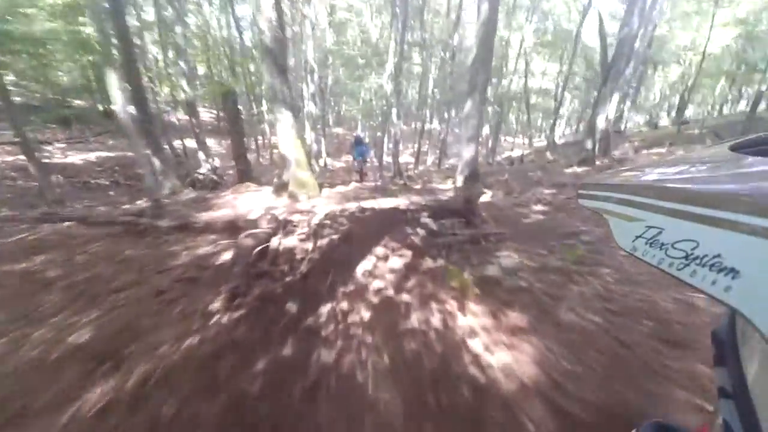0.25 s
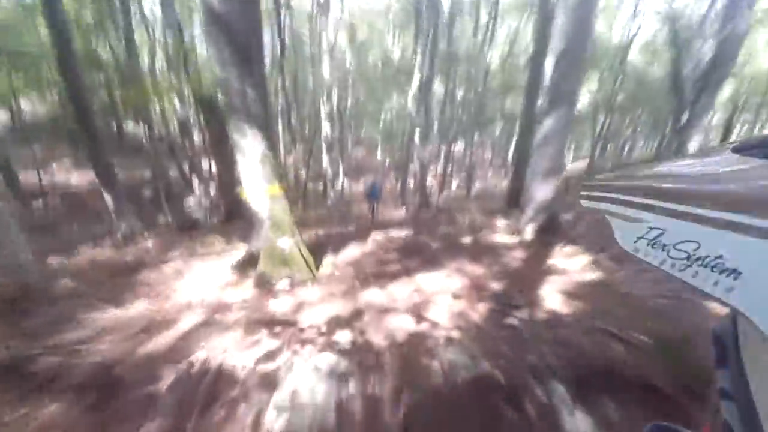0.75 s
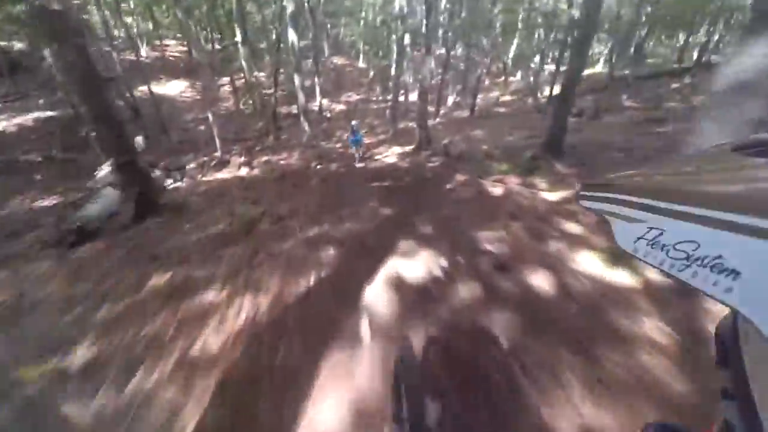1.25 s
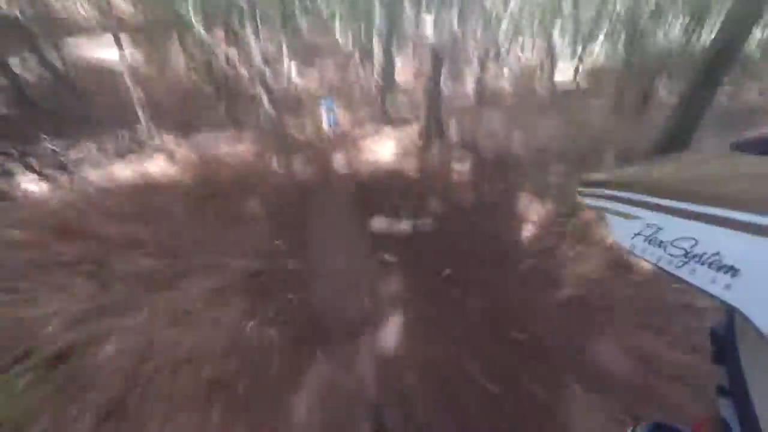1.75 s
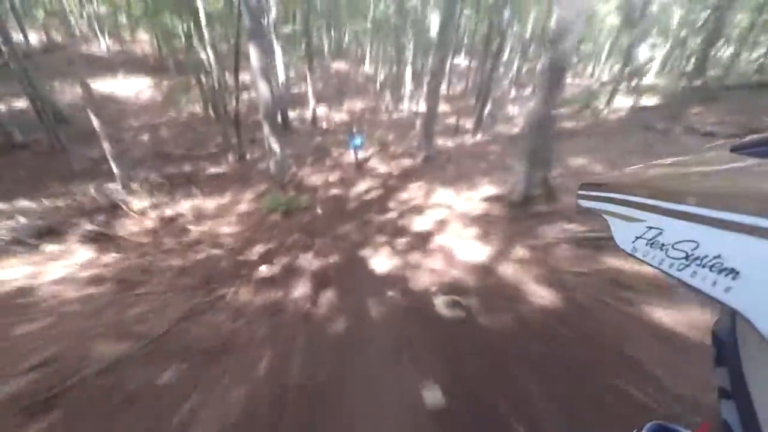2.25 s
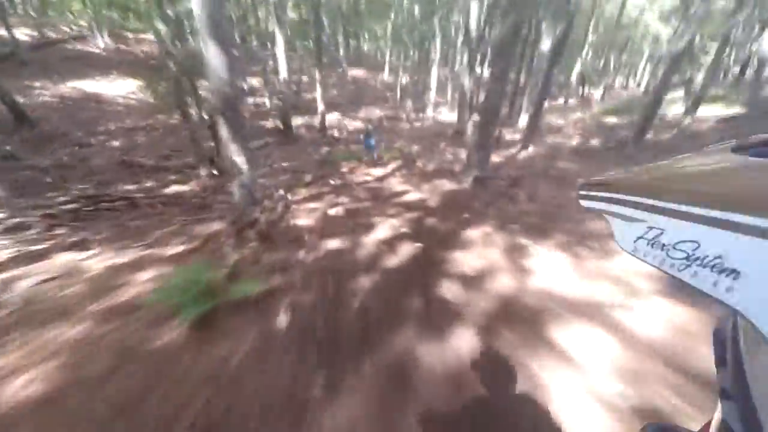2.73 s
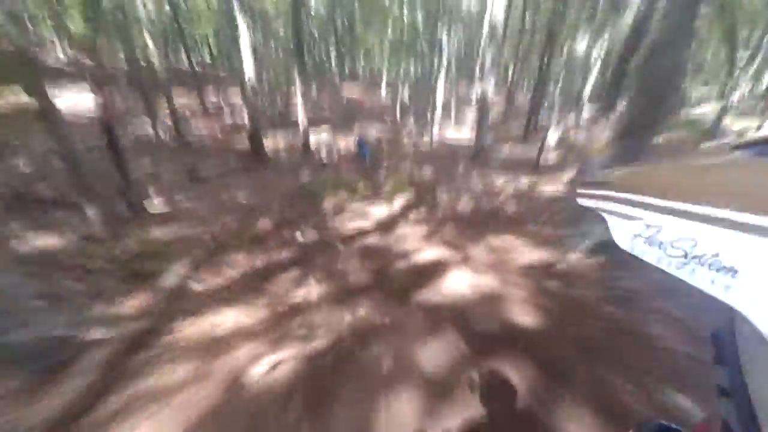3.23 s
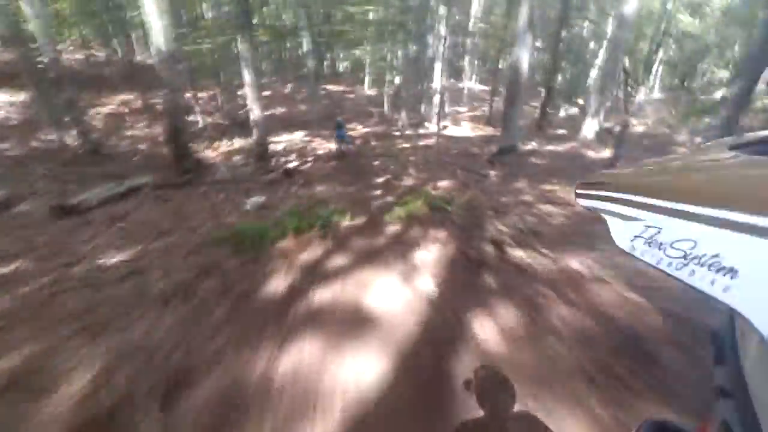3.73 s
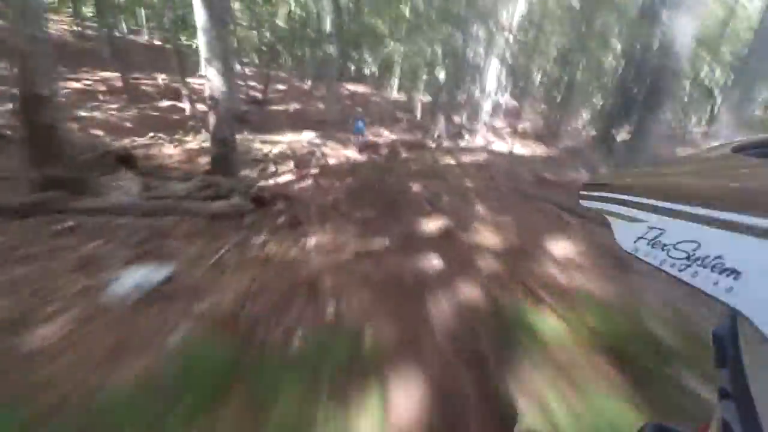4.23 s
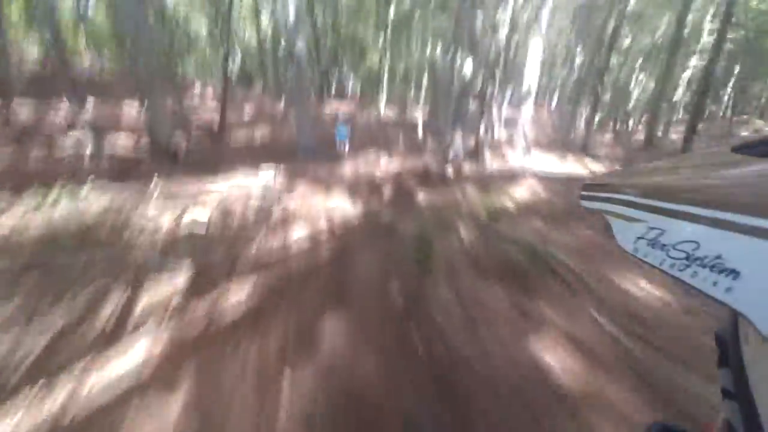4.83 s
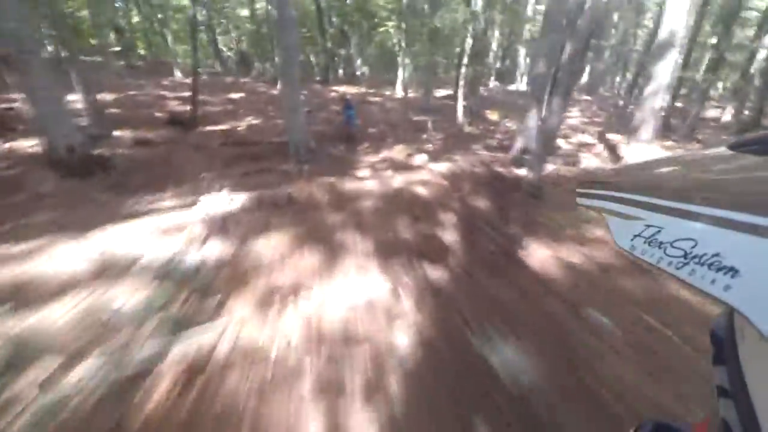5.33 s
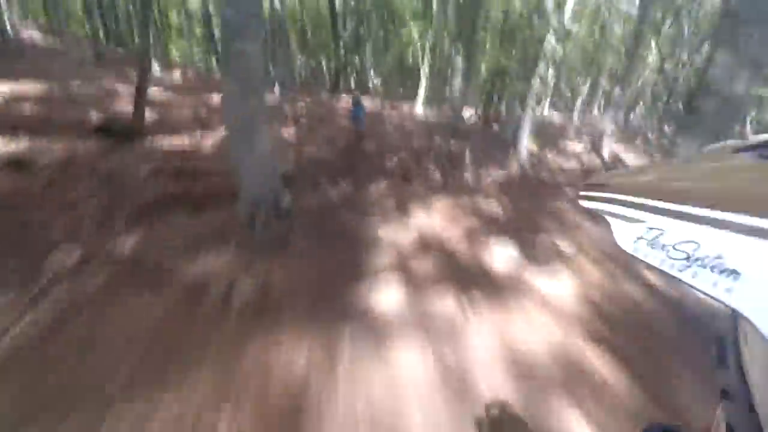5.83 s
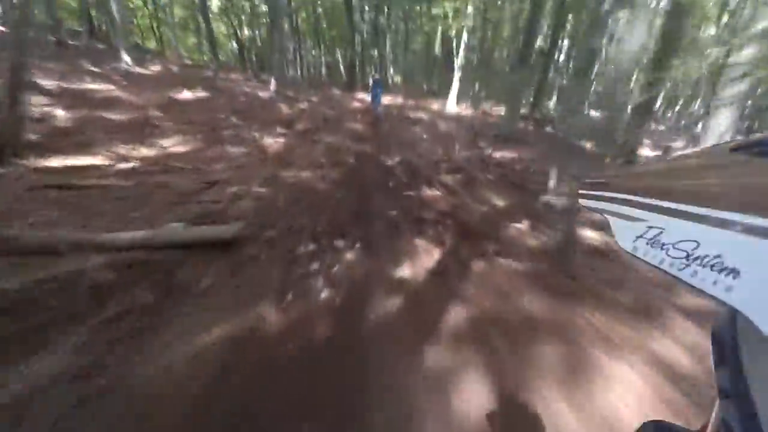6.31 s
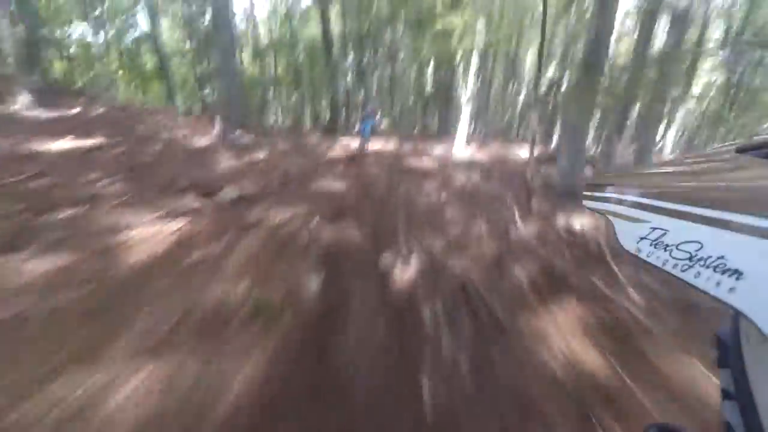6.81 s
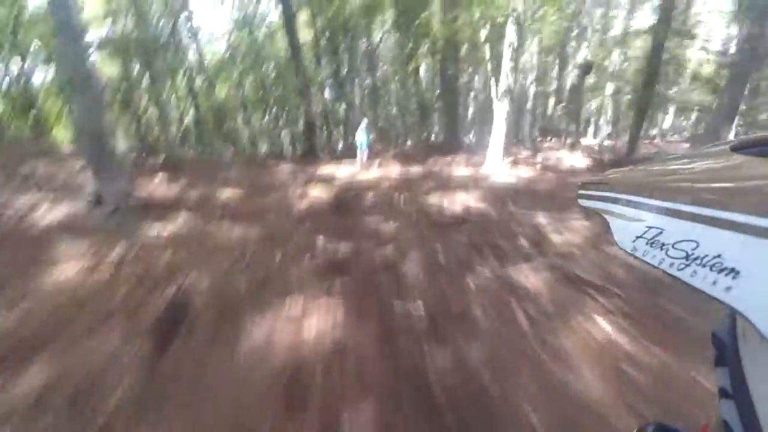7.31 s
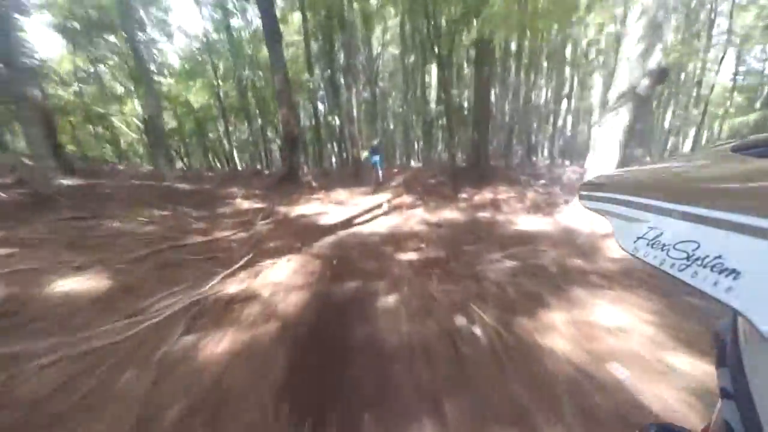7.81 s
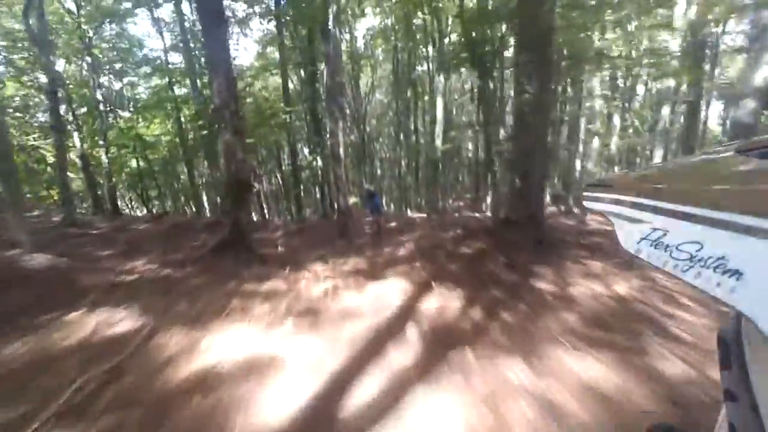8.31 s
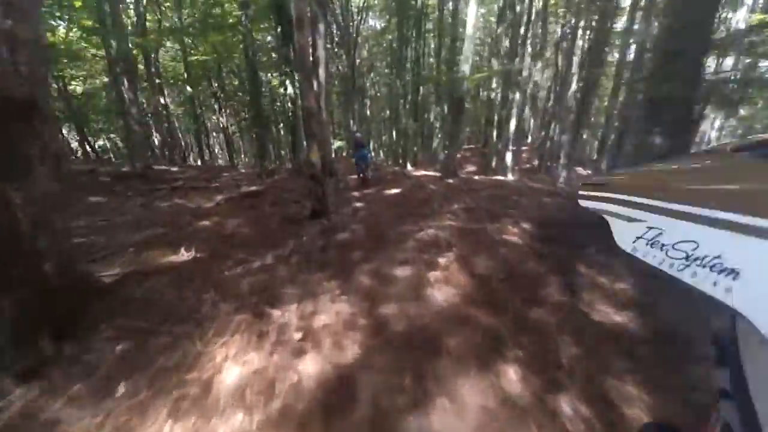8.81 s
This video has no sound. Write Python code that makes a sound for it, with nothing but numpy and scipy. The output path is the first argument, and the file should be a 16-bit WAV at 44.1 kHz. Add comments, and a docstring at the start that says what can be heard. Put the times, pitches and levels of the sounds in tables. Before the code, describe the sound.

A microphone on a rider's helmet, very close and nearly mono, descends a rough dirt trail in woods for about nine seconds. Deep wind buffeting and a faint airy rush run throughout, with soft gritty tyre hiss and a faint hollow housing hum near 500 Hz coming and going. The first 1.4 s is mostly wind and rolling, with a light bump near 0.4. At 1.5-1.9 s violent jolts overload the microphone: booming thuds, dull knocks, dense rattle. A hollow knock lands at 2.0, small clacks and metallic ticks at 2.4. Thuds and thin knocks crowd 2.9-3.9, with faint high grazing hisses near 2.7 and 3.0. Bumps hit at 4.2 and 4.7-5.0, then a loud clank at 5.3. Afterwards it smooths; tyre hiss surges and flutters brighter, with bumps at 6.5 and around 7, a small knock at 7.7, and a soft thud at 8.55, ending mid-ride.

```python
"""Helmet camera on a rough forest trail

A small camera on a helmet rides a bike downhill. Shaped noise makes the wind, head sway and jolts that press
on the microphone, and each bump swells them; single low swings make the thuds through the frame.
Fluttering noise makes the tyre hiss on dirt and leaves, and noise in narrow bands makes the housing hum.
Dying modes and short cracks make the loose parts that knock, rattle and tick; faint air and grazes lie behind.
"""
import sys
import numpy as np
from scipy import signal
from scipy.fft import rfft, irfft
from scipy.io import wavfile
from scipy.ndimage import uniform_filter1d

SR = 44100
rng = np.random.default_rng(int(sys.argv[2]) if len(sys.argv) > 2 else 0)


def master(y):
    """Save y as 16-bit WAV."""
    cut = np.clip(np.atleast_2d(y).T, -1, 1)
    pcm = np.round(cut * 32767)  # scale
    wavfile.write(sys.argv[1], SR, pcm.astype(np.int16))


N = 399546  # length in samples


def amp(db):
    """Decibels to gain."""
    return 10 ** (np.asarray(db) / 20)


def evened(x):
    """Scales to rms 1."""
    return x / np.sqrt(np.mean(x ** 2) + 1e-20)


def curve(rows):
    """Joins (time, level) points by straight lines, one value a sample."""
    s, level = np.transpose(rows)
    return np.interp(np.arange(N) / SR, s, level)


def coloured(points):
    """Noise of rms 1 whose spectrum runs through (pitch, level) points on a log pitch scale."""
    f, db = np.transpose(points)
    hz = np.fft.rfftfreq(N, 1 / SR)
    gain = amp(np.interp(np.log(hz + 1), np.log(f + 1), db))
    return evened(irfft(rfft(rng.standard_normal(N)) * gain, N))


def wander(hz):
    """Random flutter of rms 1, strongest between hz / 4 and hz."""
    band = signal.butter(1, [hz / 4, hz], "bandpass", fs=SR, output="sos")
    return evened(signal.sosfilt(band, rng.standard_normal(N)))


def steadied(x, seconds, share):
    """Divides out part of the noise's own swell, so that its level follows the ride."""
    power = uniform_filter1d(x ** 2, int(seconds * SR)) + 0.097
    return evened(x / power ** (share / 2))


def resonate(x, hz, width):
    """One resonance of gain about 1 at hz; a narrower width in Hz rings longer."""
    r = np.exp(-np.pi * width / SR)
    pole = r * np.exp(2j * np.pi * hz / SR)
    return 2 * signal.lfilter([1 - r], [1, -pole], x).real


def ring(hz, db, t60, phase, rise_cycles):
    """A sum of dying modes; each builds up over a number of its own cycles."""
    t = np.arange(5000)[:, None] / SR
    modes = amp(db - 60 * t / t60) * np.sin(2 * np.pi * (hz * t + phase))
    return (modes * (1 - np.exp(-hz * t / rise_cycles))).sum(1)


def add(mix, s, sound):
    """Adds a sound at time s."""
    part = mix[round(s * SR):][:len(sound)]
    part += sound[:len(part)]


# bumps that rock the camera after roots and stones: peak_s, level_db, lasts_s
BUMPS = [(0.414, -20, 0.034), (1.512, -5, 0.019), (1.611, -13, 0.18), (1.781, -7.5, 0.12),
         (2.076, -22, 0.21), (2.459, -17.5, 0.075), (2.561, -11.5, 0.062), (2.987, -9.5, 0.16),
         (3.306, -15.5, 0.103), (3.385, -9, 0.27), (3.6, -15, 0.079), (3.81, -18, 0.11),
         (3.927, -12.5, 0.09), (4.224, -12, 0.09), (4.754, -12.5, 0.2), (4.96, -8.5, 0.06),
         (5.404, -21, 0.43), (6.492, -7.5, 0.072), (6.906, -14, 0.1), (6.992, -11.5, 0.052),
         (7.194, -13.5, 0.05), (8.559, -27, 0.41)]
ROCK_FADE_DB = 18  # each swell rises and falls by this much over its lasts_s


def rocking():
    """How hard the bumps rock the camera, as a gain: the powers of overlapping swells add up."""
    t = np.arange(0, N / SR, .002)
    power = sum(amp(db - ROCK_FADE_DB * abs(t - s) / lasts) ** 2 for s, db, lasts in BUMPS)
    return np.interp(np.arange(N) / SR, t, np.sqrt(power))


# colour of the noise that tells the channels apart: pitch_hz, relative level_db (per Hz)
APART = [(33, 4), (150, -4), (735, -21), (2700, -42), (13000, -30.5)]


def channel_noise():
    """Faint noise of opposite sign in the two channels, stronger under bumps."""
    return (amp(-79.0) + amp(-65.5) * rocking()) * coloured(APART)


# colour of the rush of air that remains when the tyres fall quiet: pitch_hz, relative level_db (per Hz)
AIR = [(100, 16.5), (250, -1), (2000, -10.5), (2850, -4), (3150, -32), (6300, -16.5), (9000, -26.5),
       (15000, -30)]
AIR_DB = -54.5  # level around which the air flutters


def air():
    """Steady rush of air: coloured noise with a slight flutter."""
    return amp(AIR_DB + 0.53 * wander(23)) * coloured(AIR)


# a thin high hiss, perhaps a brake pad grazing: start_s, end_s, level_db
GRAZES = [(2.7, 2.825, -67), (2.955, 3.028, -64)]
GRAZE_FADE_S = .012


def grazes():
    """Narrow, fluttering hiss near the top of hearing, held while the pad touches."""
    narrow = resonate(resonate(rng.standard_normal(N), 14400, 1100), 13500, 1800)
    hiss = evened(narrow * amp(2.6 * wander(80)))
    t = np.arange(N) / SR
    touch = np.zeros(N)
    for start, end, db in GRAZES:
        held = np.tanh((t - start) / GRAZE_FADE_S) - np.tanh((t - end) / GRAZE_FADE_S)
        touch += amp(db) * held / 2
    return hiss * touch


# small metallic ticks: start_s, level_db, pitch_hz, ring_db (against level_db)
TICKS = [(1.477, -32, 7070, -6.5), (1.6095, -38, 6470, -8), (1.964, -47, 6840, -4), (2.38, -24, 8240, -28),
         (2.387, -24.5, 6800, -29), (3.079, -37, 7000, -16), (3.432, -42, 6800, -9), (4.765, -48, 6900, -2),
         (4.8314, -42, 6570, -15), (5.7279, -43, 6300, -5), (7.1254, -35, 6340, -8)]


def ticks():
    """Tiny metal parts: a bright crack, strongest near their pitch, with a short ring of two modes."""
    out = np.zeros(N)
    cracks = rng.standard_normal((len(TICKS), 800)) * np.exp(-np.arange(800) / 80)
    bright = signal.butter(2, [4000, 13000], "bandpass", fs=SR, output="sos")
    for (s, level_db, hz, ring_db), crack in zip(TICKS, cracks):
        modes = ring(hz * np.array([1, 1.28]), np.array([0., -5.]), 0.044, 0, 11.0)
        pitched = .5 * crack + 5.3 * resonate(crack, hz, 1600)
        add(out, s, amp(level_db + ring_db) * modes)
        add(out, s, amp(level_db - 12.0) * signal.sosfilt(bright, pitched))
    return out


# a knock that slips off its contact and drops in pitch: start_s, peak_db, from_hz, to_hz, lasts_s
SLIP = (2.036, -40.5, 1450, 720, .015)


def slip():
    """A short tone that falls fast at first, then levels out."""
    out, (s, peak_db, from_hz, to_hz, lasts) = np.zeros(N), SLIP
    u = np.arange(0, lasts, 1 / SR) / lasts
    hz = to_hz + (from_hz - to_hz) * (1 - u) ** 2
    tone = np.sin(2 * np.pi * np.cumsum(hz) / SR)
    add(out, s, amp(peak_db) * np.sqrt(np.sin(np.pi * u)) * tone)
    return out


RATTLES_PER_S = 1700  # at a rocking gain of 1
RATTLE_DB, RATTLE_SPREAD_DB = -56.5, 1  # overall gain; scale of the random boost of each tap


def rattle():
    """Faint chance taps on the mount, denser the harder the camera rocks; four spots, each with its own colour."""
    hz, db, t60 = np.transpose(MOUNT)
    struck = rng.random(N) < RATTLES_PER_S * rocking() ** 3 / SR
    taps = amp(RATTLE_SPREAD_DB * np.minimum(rng.exponential(1, N), 3)) * struck
    spot = rng.integers(0, 4, N)
    out = np.zeros(N)
    for k, colour_db in enumerate(2.95 * rng.standard_normal((4, len(MOUNT)))):
        mode_db = db + colour_db - 15.0 * (hz > 4400) - 6.0 * (hz < 900)
        out += signal.oaconvolve(taps * (spot == k), ring(hz, mode_db, 0.9 * t60, 0, 0.064))[:N]
    return amp(RATTLE_DB) * out


# modes of the mount, which the rattle plays too: pitch_hz, relative level_db, t60_s (time to die by 60 dB)
MOUNT = [(763, 7, 0.04), (1016, -9, 0.14), (1124, 3.5, 0.03), (1285, 6, 0.017), (1716, -4, 0.015),
         (2000, 9.5, 0.0081), (2350, 10, 0.0077), (2840, -1.5, 0.015), (3496, 1.5, 0.013),
         (4100, -5, 0.0079), (4754, 3.5, 0.024)]
# how each kind of blow rings the mount, by name: upper_hz (upper mode struck most directly),
# fall_db (loss one octave away from it), lower_hz (lower mode struck most directly), lower_db (lower modes),
# top_db (top mode), crack_db (against the blow), rise_cycles (cycles to build up)
BLOWS = {"thin": (3500, 10, 775, -34, -24, -15, 2), "plain": (2400, 9, 775, -20, -33, -20, 5),
         "round": (2000, 4.5, 1280, -8.5, -37, -22.5, 3.5), "dull": (1700, 10, 1290, -8, -27, -19.5, 3.5),
         "hollow": (1650, 39, 775, -26, -49, -30, 2), "clack": (2250, 2.5, 1110, 4.5, -15, -14, 0.45),
         "clank": (1990, 13, 1280, 0, -15.5, -19.5, 4)}
# knocks of loose parts: start_s, level_db, kind of blow
KNOCKS = [(0.2156, -44.5, "round"), (1.4899, -22, "dull"), (1.502, -23.5, "dull"), (1.546, -31, "round"),
          (1.613, -37, "dull"), (1.632, -35, "thin"), (1.7473, -28.5, "dull"), (1.784, -19.5, "round"),
          (1.7896, -25, "plain"), (2.034, -15, "hollow"), (2.3355, -35, "thin"), (2.378, -29, "thin"),
          (2.3876, -24.5, "clack"), (2.537, -28.5, "thin"), (2.8647, -33.5, "plain"),
          (2.945, -24.5, "dull"), (2.952, -20.5, "thin"), (3.0084, -25.5, "plain"), (3.274, -33.5, "round"),
          (3.3773, -26.5, "thin"), (3.478, -29.5, "plain"), (3.627, -32.5, "thin"), (3.764, -22, "plain"),
          (3.859, -23.5, "plain"), (4.207, -32.5, "dull"), (4.22, -32.5, "thin"), (4.295, -37, "thin"),
          (4.3046, -32.5, "thin"), (4.737, -38, "round"), (4.803, -26, "dull"), (4.844, -29, "dull"),
          (4.88, -28, "plain"), (4.9177, -29, "plain"), (4.923, -24, "round"), (5.141, -38, "plain"),
          (5.3047, -5, "clank"), (5.366, -35.5, "thin"), (6.0457, -30.5, "round"), (6.44, -35, "thin"),
          (6.4663, -26, "dull"), (7.681, -31, "plain")]
DETUNE, UNEVEN_DB = .012, 1.2  # no two blows land alike: spread of mode pitch (share) and strength


def knocks():
    """Each blow rings one upper and one lower mode of the mount most, their neighbours less, with a broad crack."""
    out, (hz, db, t60) = np.zeros(N), np.transpose(MOUNT)
    phases = rng.random((len(KNOCKS), len(MOUNT)))
    spreads = rng.standard_normal((len(KNOCKS), 2, len(MOUNT)))
    broad = signal.butter(2, [800, 7000], "bandpass", fs=SR, output="sos")
    cracks = signal.sosfilt(broad, rng.standard_normal((len(KNOCKS), 900))) * np.exp(-np.arange(900) / 90)

    def distance(struck_hz):
        """Root of the octaves between each mode and the mode nearest to the struck pitch."""
        nearest = hz[np.argmin(abs(hz - struck_hz))]
        return np.sqrt(abs(np.log2(hz / nearest)))

    for (s, level_db, kind), phase, (off, uneven), crack in zip(KNOCKS, phases, spreads, cracks):
        upper_hz, fall_db, lower_hz, lower_db, top_db, crack_db, rise_cycles = BLOWS[kind]
        lower_modes_db = lower_db - 23 * distance(lower_hz)
        upper_modes_db = -abs(fall_db) * distance(upper_hz)
        weight_db = np.select([hz < 1500, hz < 4400], [lower_modes_db, upper_modes_db], top_db)
        mode_db = db + weight_db + UNEVEN_DB * uneven
        add(out, s, amp(level_db) * ring(hz * (1 + DETUNE * off), mode_db, t60, 0.13 * phase, rise_cycles))
        add(out, s, amp(level_db + crack_db) * crack)
    return out


# housing modes, lowest first: pitch_hz, width_hz, relative level_db
HUM = [(500.3, 12.5, 2.5), (1010, 16, -10), (1103, 43, -11)]
# level of the narrow-band housing hum, whose swells are chance: time_s, level_db (before the level of each mode)
HUMMING = [(0.06, -63.5), (0.42, -78), (0.8, -61), (1.03, -64), (1.16, -55.5), (1.21, -60), (1.29, -44.5),
           (1.42, -62), (1.8, -48), (1.9, -60), (2.25, -52), (2.44, -65.5), (2.54, -51), (2.72, -74),
           (2.82, -53), (3.3, -62.5), (3.43, -48), (3.53, -55.5), (3.62, -46), (3.69, -73), (3.88, -50.5),
           (4.26, -63.5), (5.0, -55.5), (5.12, -58), (5.27, -49), (5.38, -60.5), (5.62, -49), (5.81, -70.5),
           (5.88, -51.5), (6.15, -56.5), (7.09, -53), (7.5, -55), (7.61, -67), (7.74, -49.5), (7.82, -68),
           (7.94, -49), (8.02, -68), (8.43, -53), (9.0, -63)]


def housing_hum(dull_db):
    """The housing, shaken by the rolling, hums: noise excites a few narrow resonances."""
    hum_db = curve(HUMMING)
    (hz, width, low_db), *upper = HUM
    low = resonate(resonate(rng.standard_normal(N), hz, width), hz, 3 * width)
    low = steadied(low, .07, 1.1)
    high = sum(amp(db) * evened(resonate(rng.standard_normal(N), hz, width)) for hz, width, db in upper)
    # the upper modes follow the rolling more than the lowest one does
    return amp(hum_db + low_db) * low + amp(0.69 * dull_db + 0.27 * hum_db + 3.5) * high


# colour of the tyre hiss: pitch_hz, relative level_db (per Hz)
HISS = [(90, -34), (150, -3), (420, -1.5), (860, -7.5), (1500, -4.5), (2100, -5.5), (3200, -4.5),
        (3700, -1), (4200, -3.5), (4450, -15), (4770, -8.5), (5100, -12.5), (5500, -10), (6400, -14.5),
        (8500, -22), (10000, -34.5), (15000, -40.5)]
# tyre hiss swelling along the trail: time_s, level_db (before a few dB of make-up gain)
ROLL = [(0.06, -70), (0.4, -76.5), (0.65, -71), (0.8, -61.5), (1.07, -66.5), (1.33, -58.5), (1.38, -58.5),
        (1.5, -57), (2.25, -57), (2.75, -60.5), (3.05, -56.5), (3.5, -59.5), (3.94, -56.5), (4.3, -63),
        (4.8, -50.5), (5.05, -54.5), (5.41, -58), (5.46, -55.5), (5.53, -61.5), (5.57, -56.5),
        (5.75, -55.5), (5.86, -53.5), (6.1, -52), (6.15, -61), (6.22, -53), (6.33, -62), (6.43, -60),
        (6.5, -56.5), (6.77, -50.5), (6.84, -53), (6.88, -61), (6.96, -50.5), (7.24, -53.5), (7.29, -55),
        (7.36, -51.5), (7.53, -56.5), (7.58, -63), (7.67, -59), (7.72, -53.5), (8.08, -60), (8.12, -54.5),
        (8.19, -62), (8.22, -49), (8.38, -55), (8.44, -49.5), (8.55, -62), (8.64, -54.5), (8.77, -59),
        (8.8, -66.5), (8.88, -61), (9.03, -61)]
BRIGHT_HZ, DULL_SHARE = 3070, 0.44  # under this pitch the hiss follows only a share of the fast swells


def tyres():
    """Hiss of dirt and leaves, roughened by grit, that brightens as it swells; the housing hums along."""
    hiss_db = curve(ROLL)
    # about 90 grains a second, each a sudden lift that dies away
    grit = amp(2.5 * np.minimum(rng.exponential(1, N), 2)) * (rng.random(N) < 90 / SR)
    grit = signal.oaconvolve(grit, np.exp(-np.arange(400) / 90))[:N]
    hiss = evened(coloured(HISS) * amp(1.49 * wander(10.6)) * (1 + 0.45 * grit))
    dull = signal.sosfiltfilt(signal.butter(2, BRIGHT_HZ, fs=SR, output="sos"), hiss)
    bright = hiss - dull
    slow_db = uniform_filter1d(hiss_db, int(.7 * SR))
    dull_db = slow_db + DULL_SHARE * (hiss_db - slow_db)
    return amp(hiss_db + 4.0) * bright + amp(dull_db + 3.5) * dull + housing_hum(dull_db)


# thuds through the frame: middle_s, level_db, pitch_hz, crunch_db (against the thud, before 20 dB of make-up)
THUDS = [(1.503, -17.5, 83.6, -21.5), (1.569, -19.5, 56, -30), (1.646, -15.5, 60, -51),
         (1.736, -33, 78, -25), (1.786, -9, 60.5, -38), (1.817, -8.5, 53.3, -57), (1.847, -17.5, 64.6, -52),
         (2.063, -29, 57, -20.5), (2.461, -22, 60, -40), (2.555, -20, 61, -44), (2.877, -29, 50.5, -46),
         (2.947, -17, 72, -31), (2.967, -11, 74, -35), (2.988, -18.5, 72, -30), (3.01, -18, 76, -42),
         (3.294, -30, 60, -40), (3.33, -25, 62.5, -38), (3.392, -14.5, 66, -33), (3.428, -23, 73, -34),
         (3.494, -15.5, 60, -45), (3.575, -24, 58.6, -50), (3.642, -19, 59, -38), (3.781, -28.5, 62, -24),
         (3.926, -26, 78, -38), (4.236, -13, 67.5, -44), (4.74, -27, 79, -34), (4.781, -24, 49, -45),
         (4.843, -23, 59.4, -25), (4.877, -25.5, 97, -21), (4.935, -14.5, 59.6, -25),
         (4.99, -14.5, 64, -42), (5.381, -21.5, 52.6, -49), (5.435, -28, 57.3, -49),
         (6.455, -16.5, 43.6, -36), (6.478, -20.5, 77.5, -19), (6.895, -27, 55, -44), (7, -28, 64, -44),
         (7.695, -24.5, 59, -44), (8.553, -24.5, 51.6, -38)]
THUD_CYCLES, CRUNCH_LEAD_S = 0.54, 0.014  # width of a thud, and how early its crunch starts


def thuds():
    """One swing up and a sharp drop, with a dull crunch on its front."""
    out, t = np.zeros(N), np.arange(2600) / SR
    dull = signal.butter(2, [150, 480], "bandpass", fs=SR, output="sos")
    crunches = signal.sosfilt(dull, rng.standard_normal((len(THUDS), len(t))))
    crunches = crunches * t / 0.0071 * np.exp(1 - t / 0.0076)
    middle, fade = t.mean(), np.hanning(len(t))
    for (s, level_db, hz, crunch_db), crunch in zip(THUDS, crunches):
        cycles = hz * (t - middle)
        narrow = fade / (1 + (cycles / THUD_CYCLES) ** 2) ** 2
        add(out, s - middle, -amp(level_db) * np.sin(2 * np.pi * cycles) * narrow)
        add(out, s - CRUNCH_LEAD_S, amp(level_db + crunch_db + 20.0) * crunch)
    return out


# colour of the pressure swings of wind and rocking: pitch_hz, relative level_db (per Hz)
BUFFET = [(2, -13), (6, 3.5), (14, 16), (24, 5.5), (34, -4), (48, -15), (70, -58), (200, -100)]
# colour of the jolts of rough ground: pitch_hz, relative level_db (per Hz)
JOLT = [(25, -56), (45, 9.5), (70, 1.5), (100, -15), (140, -18.5), (180, -47.5), (500, -42), (1500, -64),
        (4000, -130)]
# wind pressing on the microphone between bumps: time_s, level_db
WIND = [(0.0, -19.5), (0.3, -33), (0.62, -15), (0.95, -25.5), (1.2, -29.5), (1.45, -29), (2.3, -23),
        (2.7, -32.5), (3.7, -25.5), (4.4, -21), (5.15, -27), (5.65, -30.5), (5.85, -22.5), (6.35, -25.5),
        (6.7, -24), (7.5, -25), (8.2, -20.5), (8.6, -27.5), (9.06, -21.5)]
JOLT_BUMP_DB, JOLT_WIND_DB = -14.5, -22  # jolts against the rocking and against the wind


def shake():
    """Pressure swings of wind and of the camera rocked by each bump, and the lumpier jolts of rough ground."""
    wind_db, rocked = curve(WIND), rocking()
    # the strongest pressure swings are squared off, as the mount reaches its stops
    buffet = evened(np.tanh(0.5 * steadied(coloured(BUFFET), 0.36, 0.18)))
    jolt = steadied(coloured(JOLT) * amp(3.22 * wander(6.5)), 0.13, 0.046)
    jolting = amp(wind_db + JOLT_WIND_DB) + amp(JOLT_BUMP_DB) * rocked
    return np.hypot(amp(wind_db), rocked) * buffet + jolting * jolt


def scene():
    """One microphone feeds both channels; a faint noise tells them apart."""
    mid = air() + grazes() + ticks() + slip() + rattle() + knocks() + tyres() + thuds() + shake()
    side = channel_noise()
    return np.array([mid + side, mid - side])


# steady offset of the left and right channel (share of full scale)
OFFSET = (-.0089, .0117)
EDGE_HZ = 15500  # upper band limit


def record(dry):
    """The largest swings flatten softly; each channel has its offset; then the band limit."""
    ceiling = 1.2
    soft = ceiling * np.tanh(dry / ceiling) + np.array(OFFSET)[:, None]
    lowpass = signal.firwin(511, EDGE_HZ, window=("kaiser", 9), fs=SR)
    return signal.oaconvolve(soft, lowpass[None], "same")


dry = scene()
out = record(dry)
master(out)
```